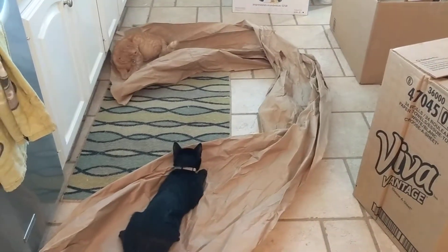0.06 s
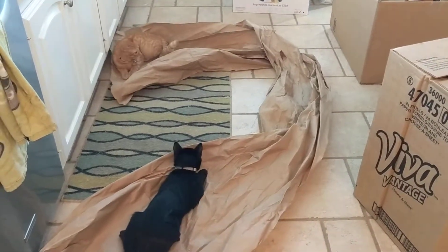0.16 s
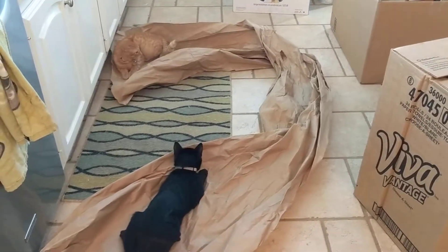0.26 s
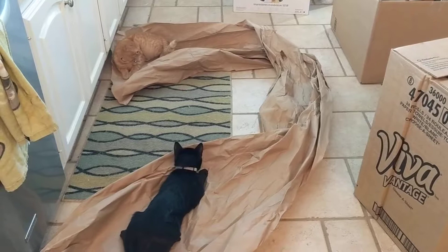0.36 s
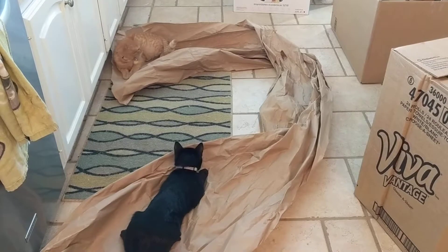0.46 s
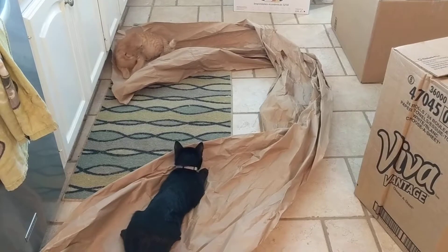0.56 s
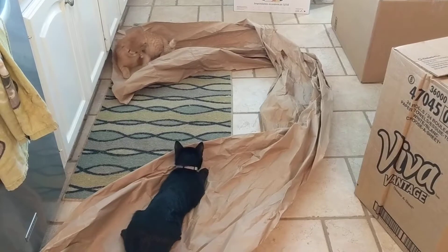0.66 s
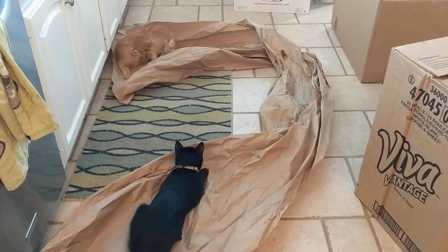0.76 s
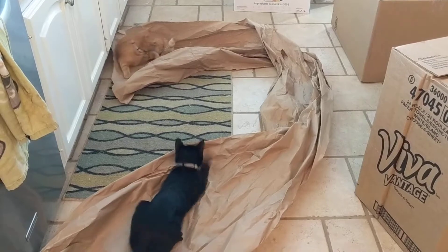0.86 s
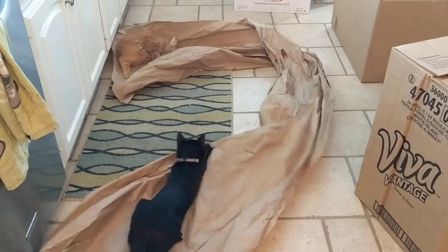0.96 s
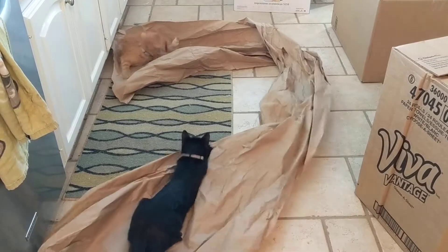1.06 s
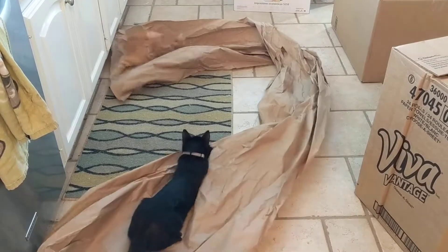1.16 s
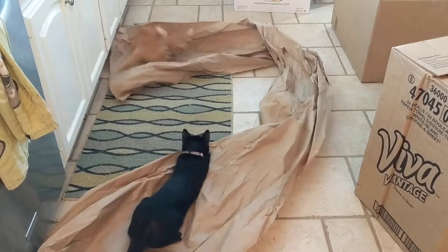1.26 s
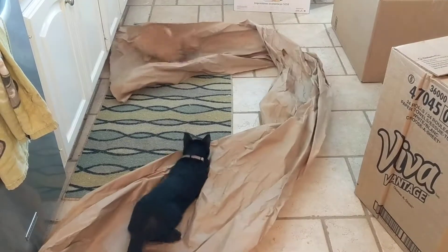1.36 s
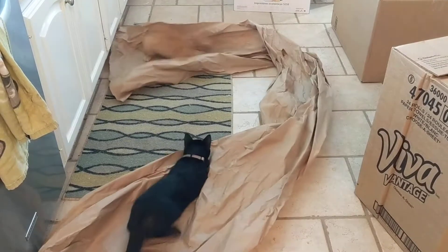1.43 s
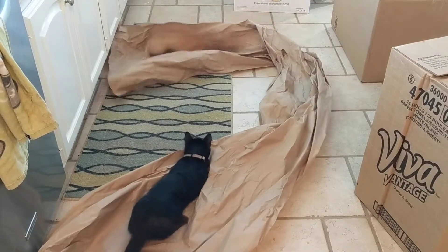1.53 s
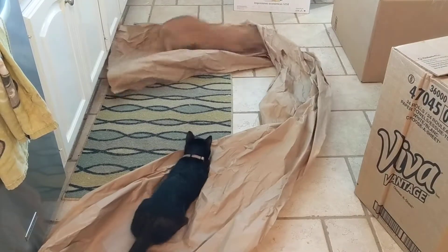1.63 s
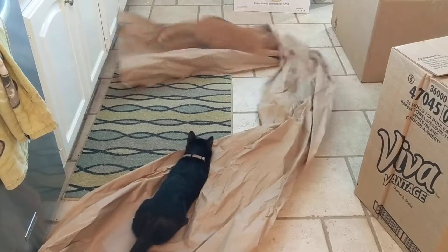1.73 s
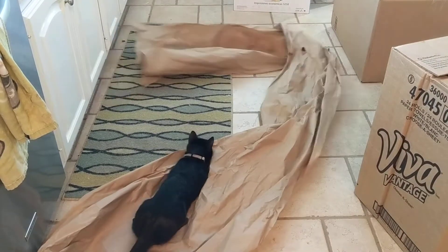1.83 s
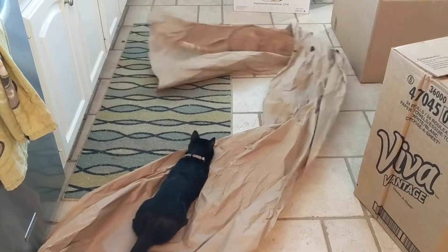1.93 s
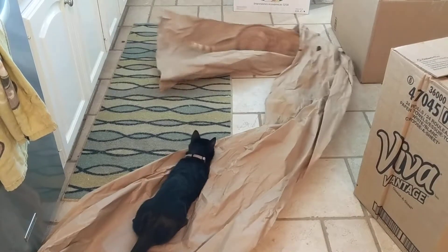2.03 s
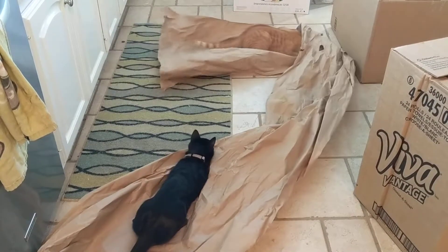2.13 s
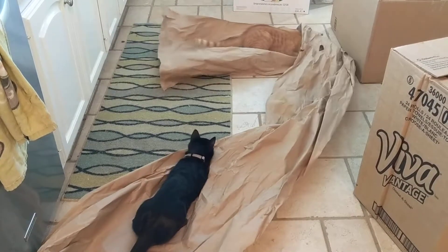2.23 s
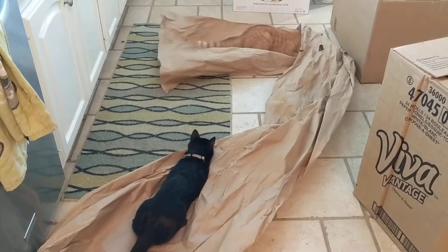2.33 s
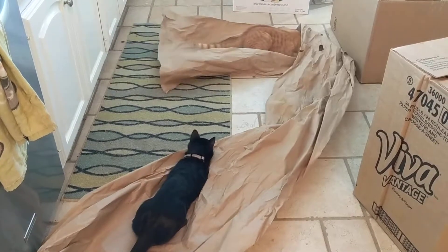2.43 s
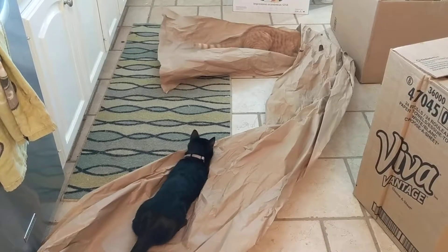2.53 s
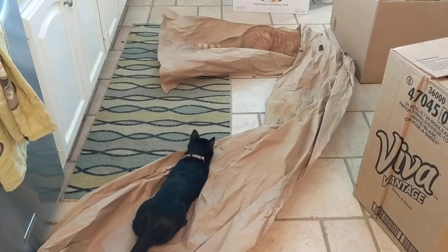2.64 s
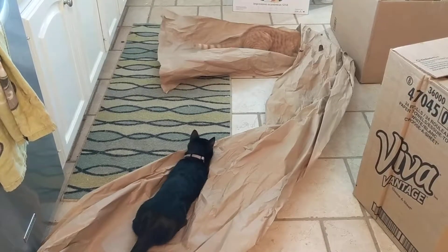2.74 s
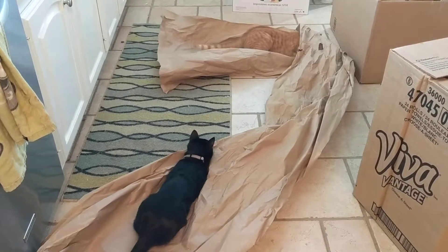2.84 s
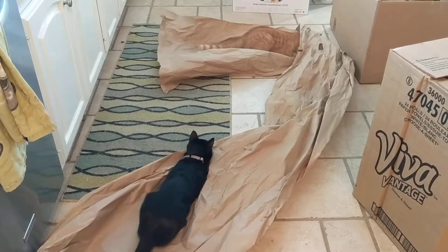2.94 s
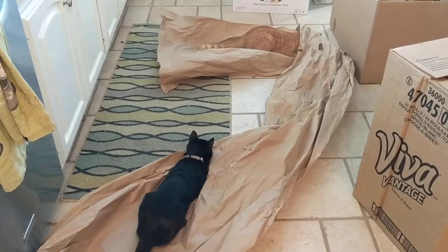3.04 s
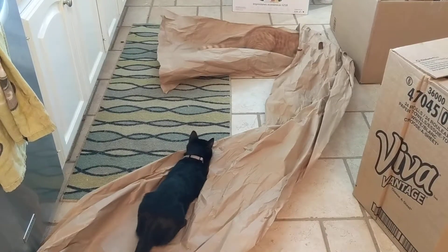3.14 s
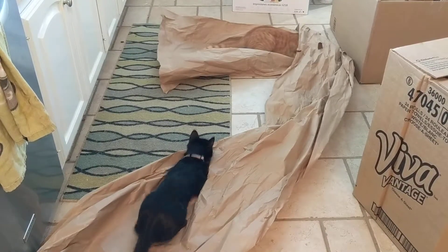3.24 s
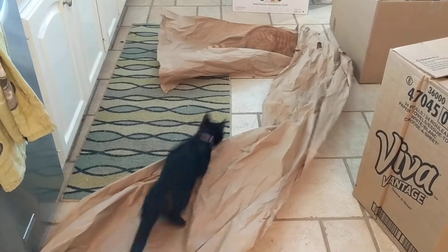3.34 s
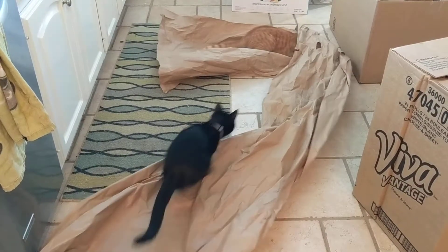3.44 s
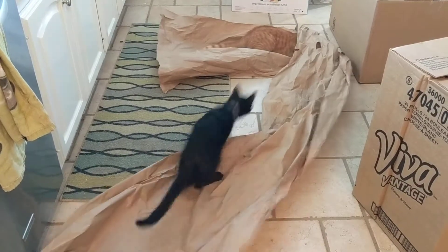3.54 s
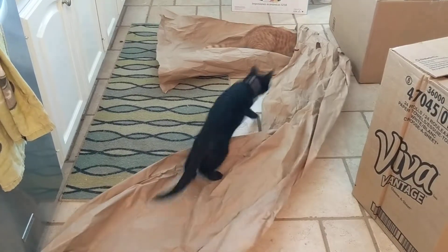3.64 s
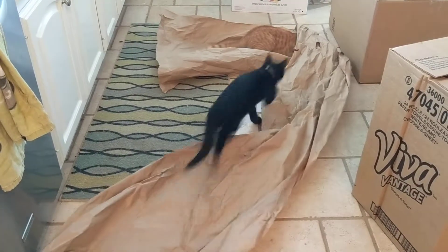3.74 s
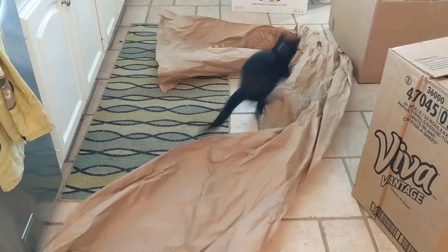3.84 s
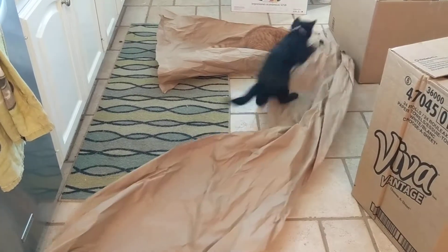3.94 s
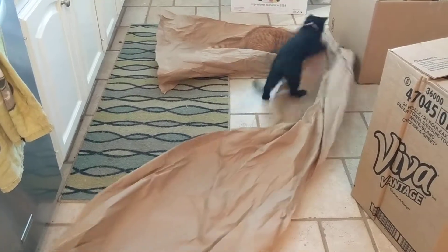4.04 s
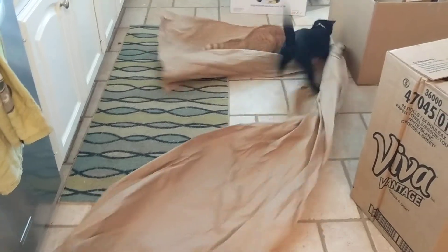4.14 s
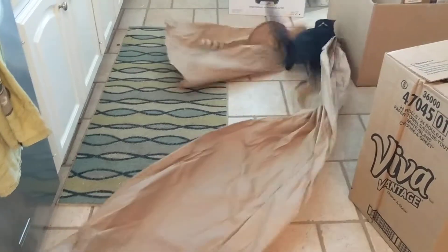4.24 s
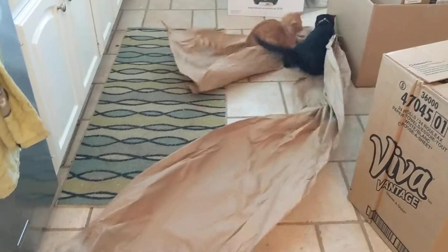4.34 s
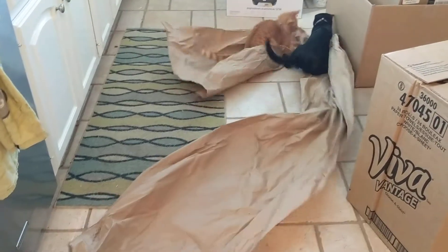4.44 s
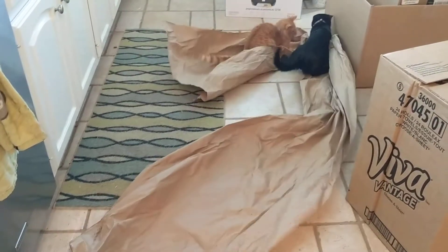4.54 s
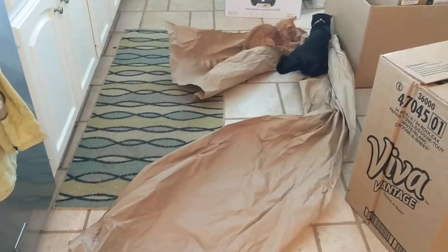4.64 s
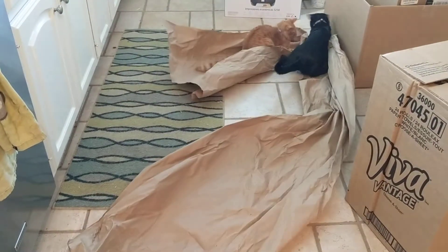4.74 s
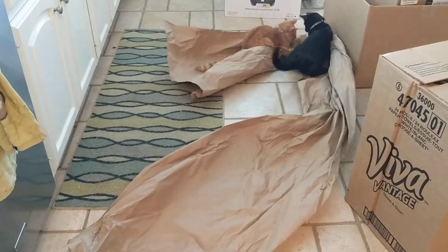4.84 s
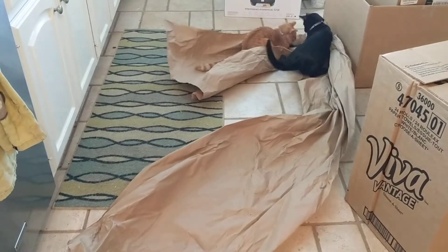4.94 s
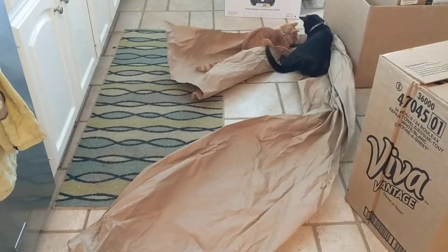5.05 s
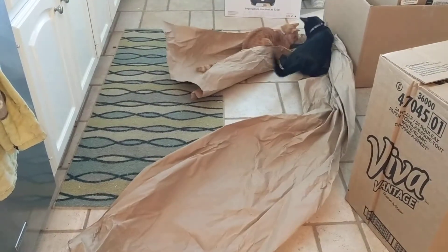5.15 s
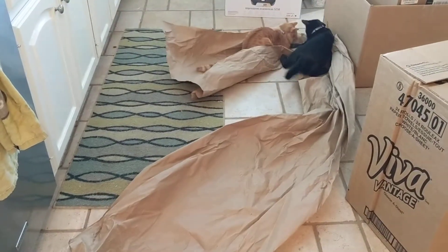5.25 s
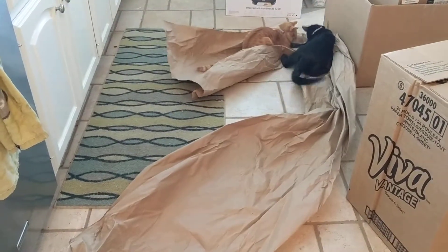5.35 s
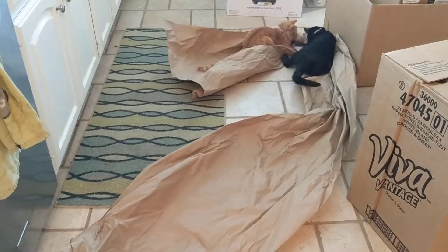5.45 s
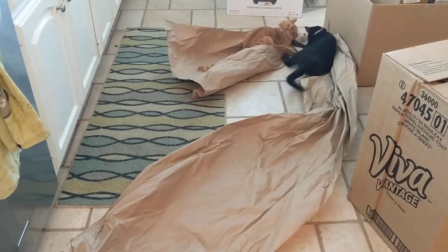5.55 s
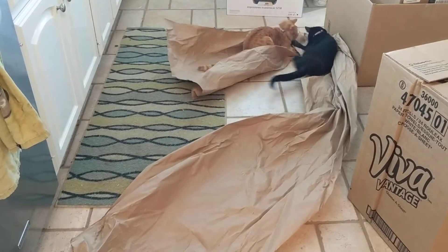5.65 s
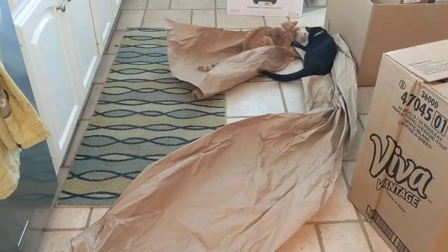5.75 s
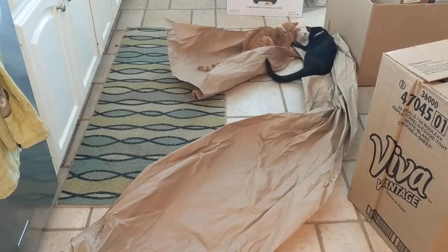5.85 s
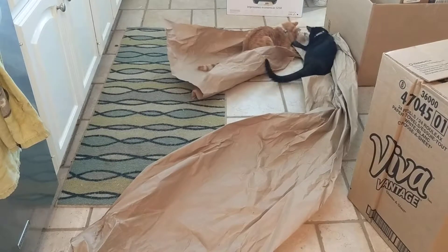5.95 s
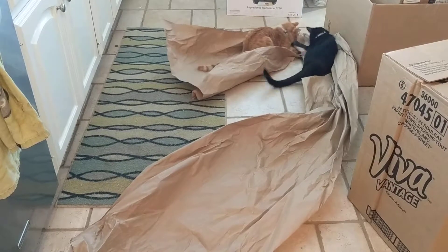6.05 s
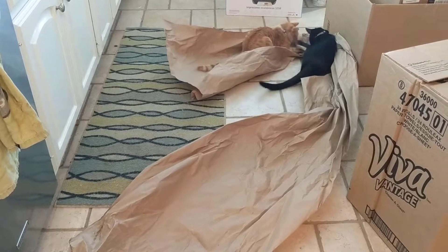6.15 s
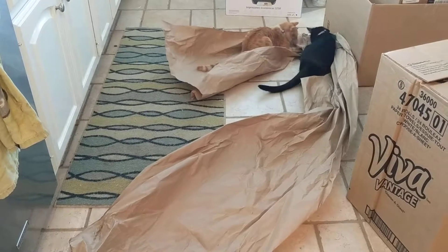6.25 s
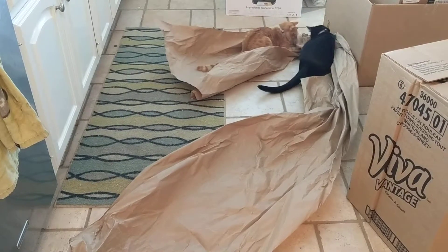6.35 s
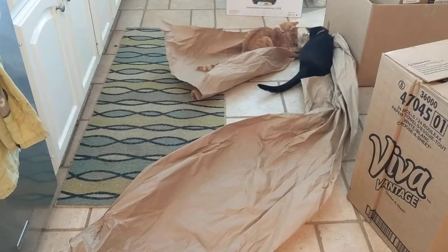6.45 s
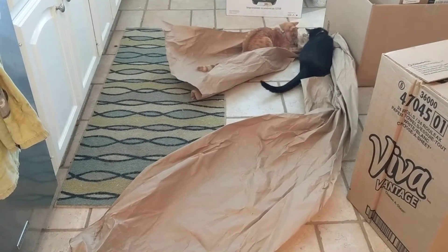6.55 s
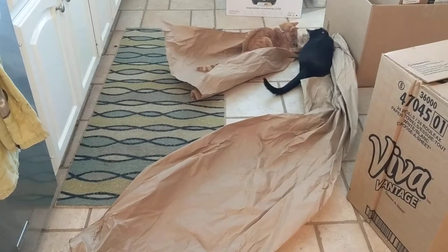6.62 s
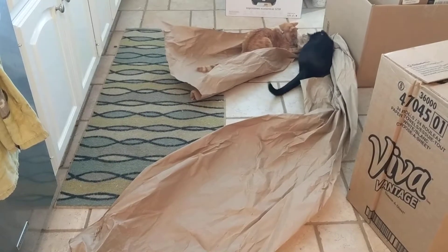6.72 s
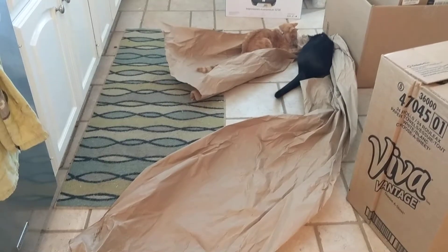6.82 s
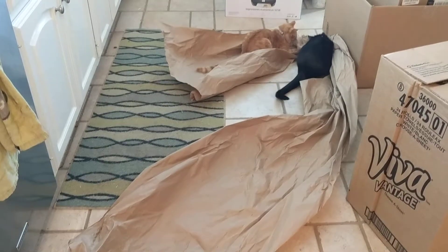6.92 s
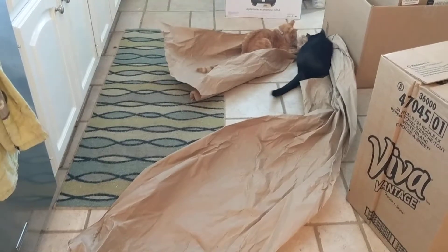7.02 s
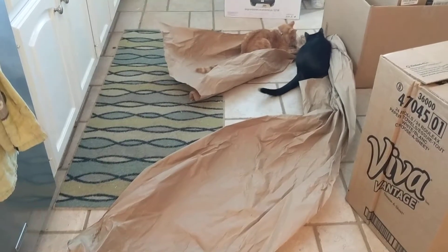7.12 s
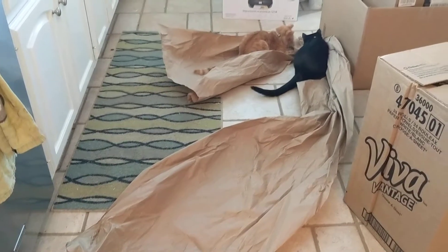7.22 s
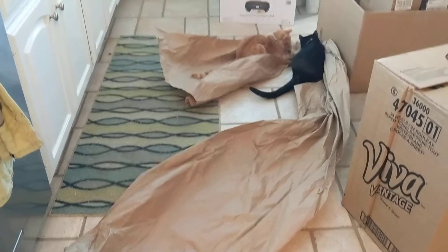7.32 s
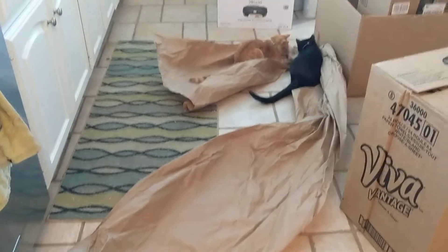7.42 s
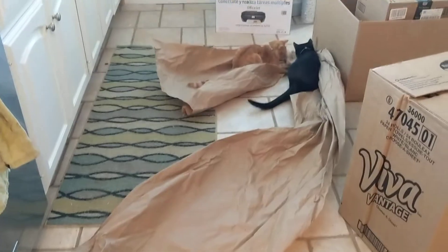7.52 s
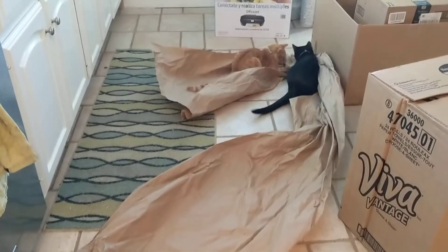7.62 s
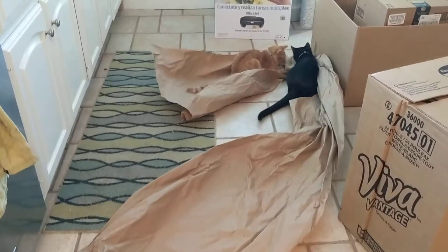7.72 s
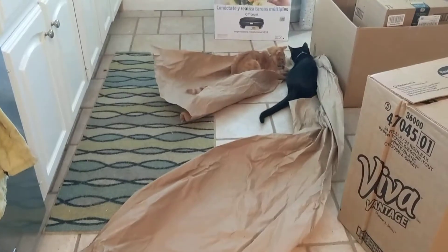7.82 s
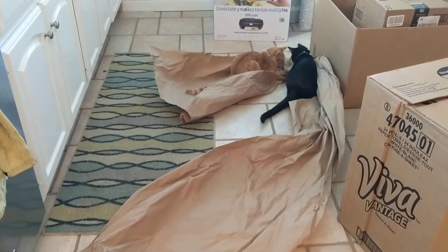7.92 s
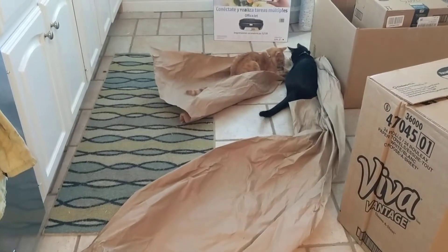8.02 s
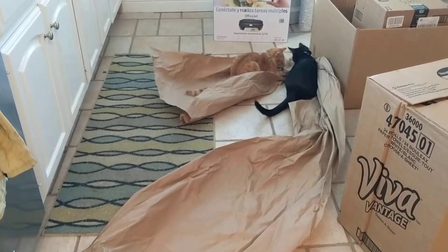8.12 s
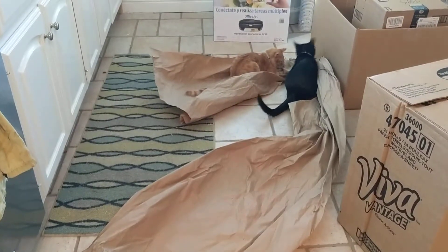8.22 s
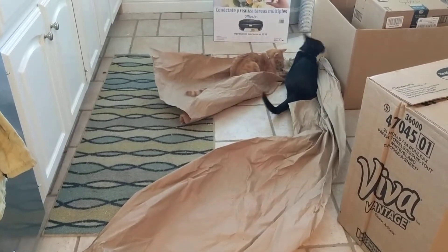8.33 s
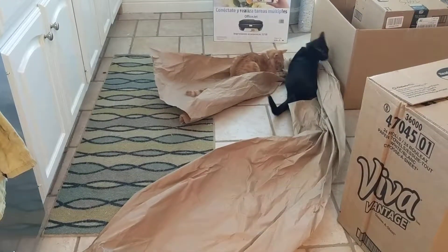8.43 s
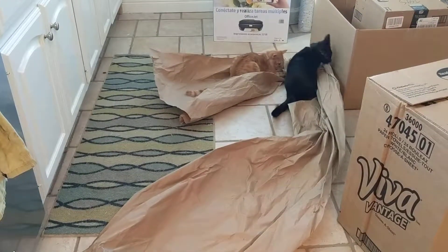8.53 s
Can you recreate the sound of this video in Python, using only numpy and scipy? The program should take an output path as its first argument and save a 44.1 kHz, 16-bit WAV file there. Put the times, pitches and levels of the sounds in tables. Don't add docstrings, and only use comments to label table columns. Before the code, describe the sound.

In a tiled kitchen, one cat dives through stiff packing paper with a dense, bright rush of crackling and popping creases. It nearly quiets, then a second cat leaps and lands on the paper in a louder crash of crinkles. Softer batting rustles and stray ticks follow. A collar bell tinkles faintly, paws thud softly, and a fridge hums. A small microphone listens from a few steps away, giving the snaps a bright edge.

```python
import sys
import numpy as np
from scipy import signal
from scipy.fft import rfft, irfft, next_fast_len
from scipy.io import wavfile
from scipy.ndimage import uniform_filter1d

SR = 44100
rng = np.random.default_rng(int(sys.argv[2]) if len(sys.argv) > 2 else 0)


def persist_wave(psi):
    counts = np.round(np.clip(psi, -1, 1) * 32767).astype(np.int16)
    wavfile.write(sys.argv[1], SR, np.atleast_2d(counts).T)


def undo_db(level):
    steps = np.asarray(level, float) / 20
    return 10 ** steps


N = 378378


def evened(x):
    return x / np.sqrt(np.mean(x ** 2) + 1e-20)


def read(points, hz):
    f, value = np.transpose(points)
    return np.interp(np.log(hz + 1), np.log(f + 1), value)


def minimum_phase(points, size=4096):
    log_gain = np.log(undo_db(read(points, abs(np.fft.fftfreq(size, 1 / SR)))))
    phase = -signal.hilbert(log_gain).imag
    return np.fft.ifft(np.exp(log_gain + 1j * phase)).real[:size // 2]


def resonance(hz, width_hz, drive):
    turn = np.exp(2j * np.pi * hz * np.arange(N) / SR)
    r = np.exp(-np.pi * width_hz / SR)
    return 2 * (turn * signal.lfilter([1 - r], [1, -r], drive / turn)).real


def panel(hz, cycles, drive):
    return signal.lfilter(*signal.iirpeak(hz, cycles, fs=SR), drive)


def drift(per_s):
    lowpass = signal.butter(2, per_s, fs=SR, output="sos")
    return evened(signal.sosfilt(lowpass, rng.standard_normal(N)))


def effort(rows, lag_s=0., linger=0.57, roundness=1.043):
    s, db, rise, fall = np.array(rows).T[:4, :, None]
    t = np.arange(0, N + 32, 32) / SR
    late = t - s - lag_s
    away = np.maximum(-late / rise, late / (fall * linger))
    power = undo_db(db - 20 * away ** roundness) ** 2
    return np.interp(np.arange(N) / SR, t, np.sqrt(power.sum(0)))


# pitch_hz, width_hz, level_db
MOTOR_LINES = [(117.4, 7.5, -66), (171.6, 3.6, -71), (237.7, 10, -73), (300, 6, -73), (356.2, 8.1, -69.5),
               (428.5, 6, -76)]


def fridge(compressor_hz=53, compressor_db=-55.5):
    hz = compressor_hz + .5 * drift(2.0)
    level = np.sqrt(2) * undo_db(compressor_db + 0.84 * drift(11.0))
    hum = level * np.sin(2 * np.pi * np.cumsum(hz) / SR)
    for line_hz, width_hz, db in MOTOR_LINES:
        hum += undo_db(db) * evened(resonance(line_hz, width_hz, rng.standard_normal(N)))
    return hum


# pitch_hz, level_db (per Hz)
AIR_COLOUR = [(20, -49), (38, -11), (60, 0), (78, -12), (103, -8), (226, -11.5), (483, -16), (2300, -20),
              (3400, -30), (6730, -34.5), (8140, -38.5), (9580, -43.5), (13000, -41), (16000, -42)]


def air(level_db=-62):
    size = next_fast_len(N)
    noise = rfft(rng.standard_normal(size)) * undo_db(read(AIR_COLOUR, np.fft.rfftfreq(size, 1 / SR)))
    return undo_db(level_db + 0.64 * drift(21.0)) * evened(irfft(noise)[:N])


# pitch_hz, level_db (per Hz)
PAPER_COLOUR = [(50, -33), (80, -10.5), (120, -16), (250, -11.5), (400, -15), (1000, -12), (3000, -12.5),
                (4300, -8), (5600, -10), (6800, -7.5), (9000, -14), (10700, -21.5), (13500, -28.5),
                (16000, -27)]


def buckling_sheet(clump_db=1.6, creases_per_s=6000, spread_db=2.0, tear_s=0.00028, rub_db=-8, patches=14):
    swarm = undo_db(clump_db * drift(60))
    size = undo_db(spread_db * np.minimum(rng.exponential(1, N), 1.9))
    creases = size * (rng.random(N) < creases_per_s * swarm / SR)
    patch = rng.integers(0, patches, N)
    fibres = rng.standard_normal(N)
    fade = np.exp(-1 / (tear_s * SR))
    buckling = np.zeros(N)
    for k, hz in enumerate(np.geomspace(200, 16000, patches)):
        tear = fibres * signal.lfilter([1], [1, -fade], creases * (patch == k))
        buckling += panel(hz, 1.16, tear)
    rubbing = np.sqrt(swarm) * rng.standard_normal(N)
    sheet = evened(buckling) + undo_db(rub_db) * evened(rubbing)
    return signal.oaconvolve(sheet, minimum_phase(PAPER_COLOUR))[:N]


# peak_s, crackle_db, rise_s, fall_s, body_db (above the crackle)
DIVE = [(.003, -43, 0.29, 0.06, 0), (.062, -55, 0.035, 0.12, 2.5), (.54, -53.5, 0.029, 0.14, -1),
        (.77, -68, .04, .06, 0), (.855, -42, 0.039, 0.46, -4.5), (.93, -35.5, 0.028, 0.036, -4),
        (.992, -29, 0.025, 0.16, -1), (1.018, -27, 0.051, 0.082, -4.5), (1.058, -29.5, 0.034, 0.073, -1.5),
        (1.037, -27.5, 0.07, 0.12, -5.5), (1.18, -35.5, 0.095, 0.36, -1.5), (1.255, -30.5, 0.054, 0.41, 1),
        (1.37, -35.5, 0.33, 0.15, -4), (1.51, -42.5, 0.057, 0.94, -1.5), (1.65, -66.5, 0.37, 0.24, -22.5),
        (1.707, -27, 0.024, 0.32, -4), (1.74, -34.5, 0.13, 0.13, 4), (1.82, -34.5, 0.24, 0.45, -2),
        (1.89, -29.5, 0.15, 0.12, -3), (2.0, -37.5, 0.32, 0.45, -7), (2.15, -45.5, 0.59, 0.29, 0.5),
        (2.32, -53, 0.14, 0.15, 7.5), (2.4, -62, .1, 0.14, 9), (2.47, -69, 0.1, 0.17, 10)]
# peak_s, crackle_db, rise_s, fall_s, body_db
LEAP = [(2.84, -54, 0.051, 0.24, 4), (2.94, -44, 0.097, 0.23, -0.5), (3.11, -52, 0.22, 0.73, -9),
        (3.27, -58.5, 0.28, 0.52, 11), (3.354, -35.5, 0.076, 0.35, -2), (3.556, -31, 0.057, 0.12, 0),
        (3.73, -53, 0.072, 0.22, -15), (3.86, -41.5, 0.24, 0.097, -1.5), (3.934, -19, 0.011, 0.039, -9),
        (3.965, -28.5, 0.082, 0.23, -0.5), (4.01, -28.5, 0.098, 0.15, -16),
        (4.091, -25.5, 0.017, 0.51, -4.5), (4.17, -27.5, 0.21, 0.53, -2.5), (4.245, -25, 0.071, 0.21, -3),
        (4.35, -31.5, 0.22, 0.49, -15), (4.52, -35, 0.33, 0.22, -2), (4.835, -46.5, 0.04, .2, 4),
        (4.874, -34.5, 0.073, 0.27, 0), (4.914, -28, 0.049, 0.16, -4)]
# peak_s, crackle_db, rise_s, fall_s, body_db
SCUFFLE = [(5.11, -43.5, 0.024, 0.44, -7), (5.21, -40, 0.26, 0.1, 0), (5.33, -46.5, 0.11, 0.17, 2.5),
           (5.47, -47, 0.16, 0.53, -14), (5.6, -45.5, 0.62, 0.13, 0.5), (5.71, -41.5, 0.19, 0.21, -0.5),
           (5.84, -48.5, 0.24, 0.16, -4), (5.93, -64, .1, 0.25, 1), (6.085, -47.5, 0.079, 0.33, 0),
           (6.18, -39, 0.15, 0.26, -0.5), (6.22, -44, .06, 0.16, 1.5), (6.23, -42, 0.092, 0.63, -3.5),
           (6.38, -54.5, 0.18, 0.23, 7.5), (6.46, -39.5, 0.11, 0.16, -1.5),
           (6.686, -48.5, 0.015, 0.07, 4.5), (6.785, -47.5, 0.076, 0.12, 1), (7.025, -50, 0.037, 0.081, 2),
           (7.15, -55.5, 0.2, 0.37, 1), (7.25, -59, .05, 0.26, 4), (7.33, -52, 0.021, 0.14, 8),
           (7.395, -44.5, 0.16, 0.084, -2), (7.5, -67, .1, 0.81, -16), (7.77, -53, 0.062, 0.28, 3),
           (7.87, -56, 0.12, 0.68, -10), (7.99, -60.5, 0.15, 0.12, 7), (8.34, -55, 0.18, 0.18, -3),
           (8.57, -55, 0.29, .2, -5)]


def crackle(paw_db=-10, paw_follows=0.99):
    size = next_fast_len(N)
    sheet = rfft(buckling_sheet(), size)
    hz = np.fft.rfftfreq(size, 1 / SR)
    crisp = read([(2000, 0), (4500, 1)], hz)
    heavy = read([(420, 1), (850, 0)], hz)
    broad = 1 - crisp - heavy
    moves = DIVE + LEAP + SCUFFLE
    body = [(s, db + body_db, rise, fall) for s, db, rise, fall, body_db in moves]
    paw = [(s, db + paw_db + paw_follows * body_db, rise, fall) for s, db, rise, fall, body_db in moves]
    layers = [(crisp, effort(moves)),
              (broad, effort(body, lag_s=0.00052, linger=0.75)),
              (heavy, effort(paw, lag_s=0.0048, linger=0.84))]
    return sum(level * evened(irfft(sheet * share, size)[:N]) for share, level in layers)


# start_s, peak_db, pitch_hz, ring_db (above the tick)
RUSH_POPS = [(0.829, -40, 6500, -5), (0.842, -40, 5300, 3), (0.853, -31, 4790, -14),
             (0.874, -30, 7150, -11), (0.9867, -20, 7200, -12), (0.989, -16, 7500, -2),
             (1.0107, -8, 8000, -19), (1.02, -14, 8000, -14), (1.334, -14, 1850, -3),
             (1.563, -28, 2340, -8), (1.686, -25, 4900, -5), (1.704, -15, 2250, -12),
             (1.802, -9, 2100, -12), (2.3016, -28.5, 4500, -8), (2.3185, -34, 2840, -0.5),
             (2.825, -40, 2330, -1), (3.0757, -36.5, 3800, 4.5), (3.168, -32, 4340, -9),
             (3.2883, -29, 1310, -2), (3.3107, -28, 4810, -7), (3.3315, -20, 4530, -18),
             (3.353, -32, 5370, -8), (3.5247, -22, 1670, -3), (3.5407, -14, 1100, -13),
             (3.709, -19, 7300, -6), (3.7789, -20, 7940, -19), (3.867, -24, 2300, 0),
             (3.9234, -12, 1020, 1.5), (3.9296, -15, 7460, 9), (3.935, -18.5, 7300, -7),
             (3.9474, -14, 7500, -16), (3.9943, -10, 6700, -7), (4.083, -28, 5000, -14),
             (4.096, -8, 6460, -24), (4.1077, -14, 9500, -5), (4.167, -12, 7500, -9),
             (4.187, -25, 8000, -14), (4.2366, -18, 6340, -4), (4.349, -11, 6500, -13),
             (4.859, -22, 6500, -11), (4.877, -24, 4850, -13)]
# start_s, peak_db, pitch_hz, ring_db, after_db
CALM_POPS = [(0.051, -30.5, 2870, -6, -15), (0.5247, -36, 1860, -2.5, -9), (.728, -52, 7850, -7, -27),
             (.7462, -43, 6500, -13, -22), (.7985, -46, 8000, -3, -25), (2.424, -37.5, 1110, 5, -13),
             (2.5386, -42, 1680, -3, -8), (2.6508, -52, 1310, 10, -5.5), (4.7396, -36.5, 2280, 3, -6.5),
             (4.7925, -45, 2040, -2, -2), (4.825, -27, 6640, -13, -15), (5.063, -34, 4490, 1, -15),
             (5.1632, -27, 4550, -11, -8), (5.3144, -24.5, 3900, -6, -11.5), (5.4377, -30, 3310, -3, -8),
             (6.0605, -43, 7020, -10, -16), (6.0764, -37, 3800, -3, -8), (6.0934, -35, 4250, 6.5, -12),
             (6.1634, -31, 2480, 6, -19), (6.438, -32, 4480, 1, -8), (6.6798, -39, 4180, -1, -19),
             (6.711, -36, 3900, -9, -20), (6.761, -33, 3260, -5, -17), (6.7732, -32, 3860, -4, -6.5),
             (6.8848, -37, 3900, -5, -7.5), (7.0083, -46, 6620, -1, -14), (7.0193, -42, 2200, -4, -6),
             (7.1295, -41, 2170, 5, -11), (7.14, -41, 6400, -5, -18), (7.2427, -35, 1660, 1, -11),
             (7.3256, -49, 1670, -4, -12), (7.388, -28, 1810, -4, -18), (7.3955, -34, 2000, -6, -20),
             (7.7421, -44.5, 3730, -5, -5), (7.7491, -34, 1870, -7, -11), (7.86, -40, 7600, 0, -6.5),
             (8.008, -45, 5030, -5, -17), (8.0467, -27.5, 4000, -10, -19), (8.3278, -29, 7000, -0.5, -11),
             (8.5649, -29, 3600, -17, -18)]
# start_s, peak_db, pitch_hz, ring_db,
# after_db
PIN_PRICKS = [(1.2349, -22, 8000, -16, -14), (1.4943, -36.5, 8000, -24.5, -16),
              (1.5756, -27, 8000, -16, -16), (1.7065, -19, 8000, -6, -16), (1.733, -17, 1500, -13, -14),
              (1.838, -21, 7500, -16, -14), (1.902, -20, 7500, -14, -16), (1.91, -18, 7500, -16, -20),
              (1.985, -20, 9500, -8, -20), (2.0, -28, 7000, -16, -20), (3.5775, -17, 7000, -7, -18),
              (4.21, -24, 8000, -16, -12), (4.4168, -20, 7760, -16, -14), (4.8454, -28, 8000, -16, -14),
              (5.0369, -35, 8000, -14, -16), (5.1192, -30, 8000, -14, -17), (5.576, -31, 7500, -12, -18),
              (5.737, -31, 6000, -16, -21), (5.803, -31, 8000, -9, -18), (5.987, -44, 9500, -7, -22),
              (6.485, -28, 5000, -14, -20), (6.547, -34, 9000, -7, -20), (6.583, -42, 7500, -12, -20),
              (7.041, -41, 4500, -6, -13), (8.481, -41, 3930, -1, -6.5), (.0518, -40, 13000, 0, -16),
              (.988, -26, 13000, -8, -16), (1.335, -28, 13000, -8, -20), (2.148, -24, 13000, -6, -20),
              (3.709, -30, 13000, -8, -18), (3.7782, -28, 12500, -8, -14), (4.824, -32, 12000, -10, -11),
              (6.0756, -40, 12000, -11, -16), (7.243, -41, 6000, -7, -15), (8.3273, -39, 13000, -5, -17),
              (8.565, -32, 13000, 4, -17), (6.18, -29, 2400, -7, -8), (6.205, -27, 1700, -5, -5),
              (5.2, -33, 1800, -5, -6), (6.446, -31, 1300, -9, -10)]
# start_s, peak_db,
# pitch_hz, ring_db, after_db
PANEL_CREAKS = [(.752, -53, 5200, 8, -22), (.758, -57, 5270, 12, -14), (.758, -68, 2450, 27, 1),
                (.768, -62, 2600, 23, -6), (2.148, -15.5, 7900, -8, -19), (8.334, -37, 7060, 1, -8),
                (8.4788, -36, 4430, -1, -12), (2.375, -44, 5000, -3, -16), (2.445, -46, 4500, -3, -16),
                (2.484, -53, 2700, 10, -12), (2.227, -40, 4650, 6.5, -4), (2.331, -41, 2680, 8, -16),
                (2.469, -59, 2700, 21, -22), (6.681, -44, 4250, 10, -10), (8.486, -47, 4750, 3, -6),
                (2.91, -27, 6500, -7, -16), (2.957, -37, 12000, -8, -28), (5.467, -36, 6970, -11, -22),
                (5.6366, -29, 6500, -9, -22)]


def snaps(pop_s=0.00086, after_s=0.0087, uneven_db=4.5, share_db=-4, thin_hz=2500, dull_hz=9800, sheen_db=-9):
    out, t = np.zeros(N + 4410), np.arange(2800) / SR
    rush = [(*row, -12.5) for row in RUSH_POPS]
    rows = [(*row, 5) for row in rush + CALM_POPS]
    rows += [(*row, 3) for row in PIN_PRICKS]
    rows += [(*row, 8.2) for row in PANEL_CREAKS]
    sheet = minimum_phase(PAPER_COLOUR)[:400]
    sheet = sheet / abs(sheet).max()
    thin = signal.lfilter(*signal.butter(1, thin_hz, "high", fs=SR), sheet)
    click = 1. * (t == 0)
    for s, db, hz, ring_db, after_db, cycles in rows:
        grain, fizz, clumps = rng.standard_normal((3, len(t)))
        pop = grain * np.sqrt(t) * np.exp(-t / pop_s)
        tick = signal.oaconvolve(pop, thin)[:len(t)]
        tick *= np.linalg.norm(thin) / np.linalg.norm(tick)
        ping = panel(hz, cycles, pop)
        ping *= np.linalg.norm(panel(hz, cycles, click)) / np.linalg.norm(ping)
        clumping = undo_db(after_db + uneven_db * evened(uniform_filter1d(clumps, size=40)))
        swarm = clumping * fizz / 4 * np.exp(-t / after_s)
        ring = ping + undo_db(share_db) * panel(hz, cycles, swarm)
        after = signal.oaconvolve(swarm, sheet)[:len(t)]
        out[round(s * SR):][:len(t)] += undo_db(db) * (tick + after + undo_db(ring_db + 23.0) * ring)
    dull = signal.sosfilt(signal.butter(3, dull_hz, fs=SR, output="sos"), out[:N])
    return undo_db(sheen_db) * out[:N] + dull


def hush(hush_db=-4, hush_s=0.11):
    t = np.arange(N) / SR
    onsets = np.sort([row[0] for row in RUSH_POPS + CALM_POPS] + [np.inf])
    ahead = onsets[np.searchsorted(onsets, t)] - t
    return undo_db(hush_db * np.exp(-ahead / hush_s))


# peak_s, level_db, rise_s, fall_s
BELL_SHAKES = [(.102, -72, .01, .1), (.657, -79, .01, .04), (1.41, -58, .15, .04),
               (1.578, -57, 0.022, 0.073), (2.266, -59, .025, 0.06), (3.615, -53, .03, 0.13),
               (3.72, -65, .03, .1), (3.78, -70, .03, 0.09), (3.84, -55.5, 0.093, 0.12),
               (4.96, -63, 0.14, 0.11), (5.06, -65, .04, .08), (5.19, -66, 0.044, 0.23),
               (5.315, -65, .02, .12)]
# pitch_hz, width_hz, level_db
BELL_MODES = [(10650, 100, -12), (10840, 90, 3), (11000, 130, 9), (12220, 120, -8)]


def bell(rattle_per_s=600):
    shell = np.zeros(N)
    for hz, width_hz, db in BELL_MODES:
        pellet = rng.standard_normal(N) * (rng.random(N) < rattle_per_s / SR)
        shell += undo_db(db) * evened(resonance(hz, width_hz, pellet))
    return undo_db(-3.5) * effort(BELL_SHAKES) * evened(shell)


# start_s, level_db, pitch_hz, t60_s
LANDINGS = [
    (0.877, -44.5, 107, 0.18),
    (1.76, -57, 80, .1),
    (3.576, -46, 119, 0.1),
    (3.97, -44, 80, 0.074),
    (6.169, -51, 131, 0.14),
    (7.201, -66, 163, 0.13),
]


def paws(rise_s=0.025):
    t = np.arange(N) / SR
    out = np.zeros(N)
    for s, db, hz, t60 in LANDINGS:
        u = np.maximum(t - s, 0)
        push = undo_db(db - 60 * u / t60) * (1 - np.exp(-u / rise_s))
        out += push * 3 * np.sin(2 * np.pi * hz * u)
    return out


# pitch_hz, t60_s
ROOM_DECAY = [(200, 0.12), (1000, 0.4), (3500, 0.46), (9000, 0.33), (15000, 0.12)]
# delay_s, level_db
FIRST_ECHOES = [(.0021, -7.5), (.0034, -14), (.0075, -22), (0.015, -13.5), (0.017, -18), (0.023, -58)]


def kitchen(x, turn_s=.015, count=30, tail_db=-3.5):
    size, hop = 11500, round(turn_s * SR)
    taps, at = np.zeros((count, size)), np.arange(200, size - 20, 20)
    at = at + rng.integers(0, 20, (count, len(at)))
    np.put_along_axis(taps, at, rng.choice([-1., 1.], at.shape), 1)
    hz, lag, z = signal.stft(taps, SR, nperseg=256)
    decay = undo_db(-60 * lag / read(ROOM_DECAY, hz)[:, None])
    tails = signal.istft(z * decay, SR, nperseg=256)[1]
    tails *= undo_db(tail_db) / np.linalg.norm(tails, axis=1, keepdims=True)
    for s, db in FIRST_ECHOES:
        delay = (s * rng.uniform(.7, 1.3, count) * SR).astype(int)
        tails[np.arange(count), delay] += rng.choice([-1, 1], count) * undo_db(db)
    long = next_fast_len(tails.shape[1] + 2 * hop)
    starts = np.arange(0, N + hop, hop)
    window = np.sin(np.pi * np.arange(2 * hop) / (2 * hop))
    pieces = np.pad(x, (hop, 3 * hop))[starts[:, None] + np.arange(2 * hop)] * window
    patterns = rfft(tails, long)[rng.integers(0, count, len(starts))]
    echoes = irfft(rfft(pieces, long) * patterns, long)
    out = np.zeros(N + hop + long)
    for start, echo in zip(starts, echoes):
        out[start:start + long] += echo
    return x + out[hop:hop + N]


def scene():
    paper = undo_db(-7.5) * hush() * crackle() + undo_db(-10.0) * snaps()
    return (fridge() + air() + kitchen(paper + bell() + paws()))[None]


def microphone_port(x, hz=8250, width_hz=620, lift_db=10.5):
    return x + undo_db(lift_db) * resonance(hz, width_hz, x[0])


def ducked(x, from_db=-36, share=0.21, smooth_s=0.19):
    power_db = 10 * np.log10(abs(uniform_filter1d(x ** 2, round(smooth_s * SR))) + 1e-12)
    return x * undo_db(-share * np.maximum(power_db - from_db, 0))


def low_pass(x):
    return signal.sosfilt(signal.butter(12, 16730, fs=SR, output="sos"), x)


def record(dry):
    band_limit = signal.firwin(511, 15800, window=("kaiser", 9), fs=SR)
    limited = signal.oaconvolve(ducked(microphone_port(dry)), band_limit[None], "same")
    return low_pass(limited)


dry = scene()
out = record(dry)
persist_wave(out)
```